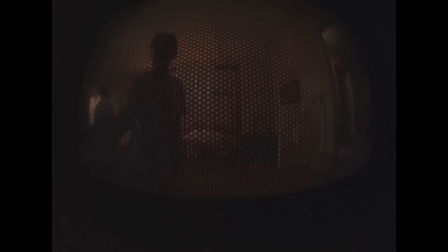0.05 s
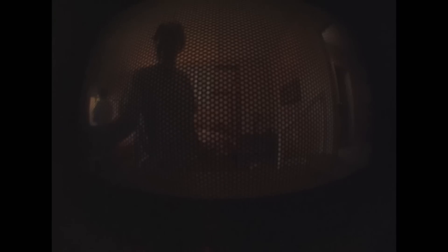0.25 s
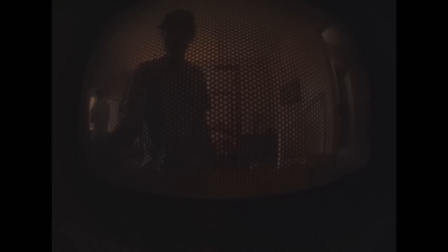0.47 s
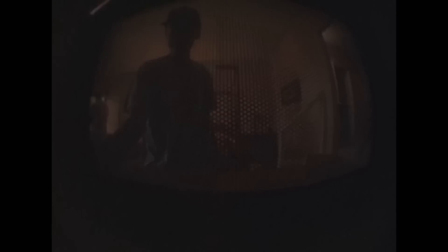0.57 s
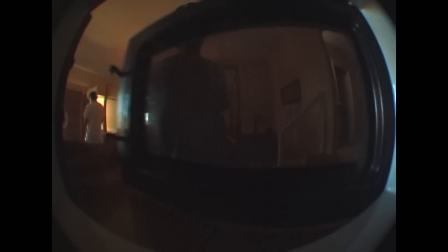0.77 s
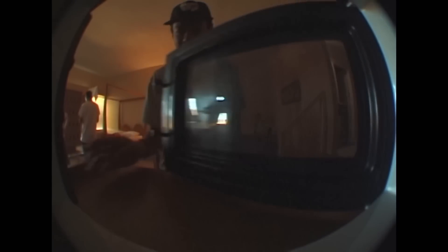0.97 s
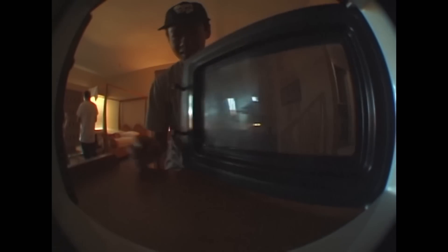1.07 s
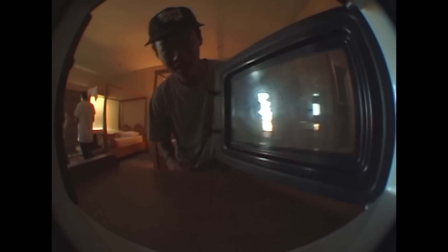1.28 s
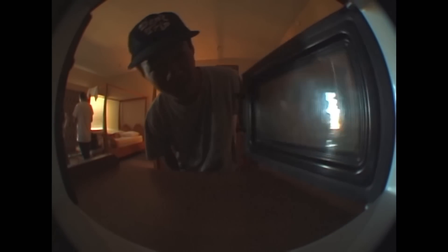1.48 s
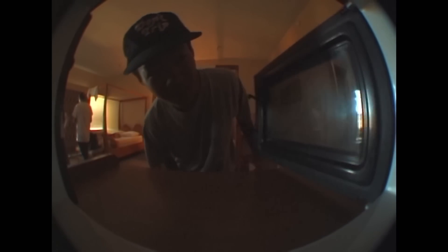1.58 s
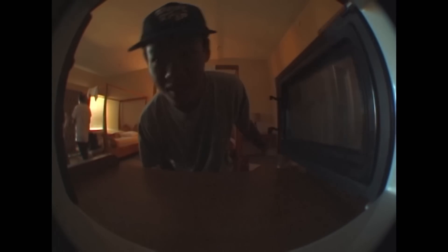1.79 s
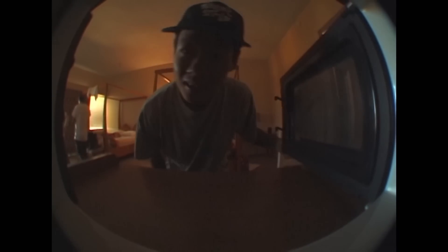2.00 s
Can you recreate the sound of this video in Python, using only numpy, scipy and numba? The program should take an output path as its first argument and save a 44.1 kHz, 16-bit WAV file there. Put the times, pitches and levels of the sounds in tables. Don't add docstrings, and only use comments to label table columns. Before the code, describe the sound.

A microwave oven door opens, heard from inside the box: latch hooks scrape and snap in a loud rattling clunk, the case shudders, then after a quiet swing the door knocks its stop, over low hum.

```python
import sys
import numpy as np
from scipy import signal
from scipy.fft import rfft, irfft, next_fast_len
from scipy.io import wavfile
from scipy.ndimage import uniform_filter1d, map_coordinates
from numba import njit

SR = 44100
rng = np.random.default_rng(int(sys.argv[2]) if len(sys.argv) > 2 else 0)


def output_pcm(signal):
    pcm = np.clip(np.atleast_2d(signal).T, -1, 1) * 32767
    wavfile.write(sys.argv[1], SR, np.round(pcm).astype(np.int16))


def ratio(d):
    e = np.asarray(d, float) / 20
    return 10 ** e


N = 90272


def unit(x):
    return x / np.sqrt(np.mean(x ** 2) + 1e-20)


def along(points, hz):
    f, v = np.transpose(points)
    return np.interp(np.log(hz + 1), np.log(f + 1), v)


def wobble(rate_hz):
    knots = rng.standard_normal(int(N * rate_hz / SR) + 4)
    return map_coordinates(knots, [np.arange(N) * rate_hz / SR])


def filtered(x, response):
    m = next_fast_len(N + SR // 2)
    return irfft(rfft(x, m) * response(np.fft.rfftfreq(m, 1 / SR)), m)[..., :N]


def shaped_noise(response):
    return unit(filtered(rng.standard_normal(N), response))


def body(peaks, f):
    total = 0
    for k, (centre_hz, width_hz, db) in enumerate(peaks):
        damping = 1j * f * width_hz
        total = total + (-1) ** k * ratio(db) * damping / (centre_hz ** 2 - f * f + damping)
    return total


def causal(gain, size):
    c = irfft(np.log(gain + 1e-4), size)
    c = np.concatenate([c[:1], 2 * c[1:size // 2], np.zeros(size - size // 2)])
    return np.exp(rfft(c))


CRACK, CRACK_S = 2.17, 0.00016


def contacts(events, colour, grit_db, octaves=9, slope=None):
    m = next_fast_len(N + SR // 2)
    f, t = np.fft.rfftfreq(m, 1 / SR), np.arange(SR) / SR
    shape, slope_db = colour(f), along(slope, f) if slope else 0
    total = 0
    for start_s, level_db, rise_s, t60_s, *centre_hz in events:
        decay = ratio(level_db - 60 * t / (t60_s + 0.0016))
        swell = decay * (1 - np.exp(-t / (rise_s + 1e-4)) + CRACK * np.exp(-t / CRACK_S))
        grit = ratio(grit_db * np.resize(wobble(900), SR))
        push = swell * unit(grit * rng.standard_normal(SR))
        distance = np.log2((f + 1) / (centre_hz or [150])[0]) / octaves
        tint = shape * causal(ratio(slope_db - 6.35 * distance ** 2), m)
        placed = np.pad(push, (round(start_s * SR), 0))[:N]
        total = total + rfft(placed, m) * tint / np.sqrt(np.mean(abs(tint) ** 2))
    return irfft(total, m)[:N]


# start_s, level_db, rise_s, t60_s
THUMPS = [(.308, -16.5, 0.0022, 0.36), (.39, -20.5, 0.06, 0.99), (.445, -10, 0.023, 0.42),
          (.545, -15, 0.0031, 0.95), (.62, -16, 0.0063, 1), (.72, -17.5, 0.0069, 0.31),
          (.96, -28, 0.014, 0.75), (1.09, -32, 0.007, 0.44), (1.6, -31, 0.014, 0.59),
          (1.833, -15, 0.0048, 1), (1.9, -17, 0.011, 0.38)]
# centre_hz, width_hz, level_db
CASE_MODES = [(60, 27, -18), (100, 19.4, -3.5), (163.5, 32.6, -2), (252.8, 26.5, -5.5), (319.6, 37, -11.5),
              (383.4, 15.3, -9.5), (450, 104, -16.5)]


def case_thumps():
    return contacts(THUMPS, lambda f: body(CASE_MODES, f), grit_db=-1.5)


# start_s, level_db, rise_s, t60_s, centre_hz
RATTLES = [(0.244, -38, 0.019, .6, 1300), (.308, -9, 0.0007, 0.25, 1530),
           (0.361, -9.5, 0.0018, 0.062, 1570), (.383, -25.5, 0.0015, 1, 1350),
           (0.4693, -6, 0.00018, 0.25, 1690), (.497, -4.5, 0.0022, 0.13, 2300),
           (.509, -7.5, 0.0015, 0.059, 2900), (0.542, -15, 0.00056, 0.1, 2600),
           (.575, -19, 0.0058, 0.7, 1390), (.64, -21.5, 0.0045, 0.76, 1600),
           (.735, -27, 0.0027, 0.25, 1700), (.82, -30, 0.0065, 0.21, 1450), (0.971, -27, 0.026, 0.24, 1440),
           (1.055, -35.5, 0.0026, 0.13, 2100), (1.601, -32.5, 0.02, 0.15, 1450),
           (1.833, -7.5, 0.00022, 0.12, 1680), (1.834, -15, 0.0008, .22, 2750),
           (1.86, -10.5, 0.031, 0.36, 1510), (1.919, -30, 0.023, 0.33, 1500)]
# centre_hz, width_hz, level_db
LATCHED_PANELS = [(560, 123, 8), (630, 51, 6.5), (1043, 16, 5.5), (1184, 78, -6.5), (1362, 92, 1),
                  (1540, 48, -2.5), (1677, 136, 0), (1860, 27, -8), (2365, 130, -5), (2430, 120, -13),
                  (2600, 44, 2), (1600, 2500, -5.5), (3520, 1340, -12)]
# centre_hz, width_hz, level_db
FREE_PANELS = [(581, 28, 7), (678, 50, 6), (965, 45, -3.5), (1087, 74, 0), (1277, 37, -0.5),
               (1440, 33.5, 4), (1530, 51, -1.5), (1690, 46, 2.5), (1894, 31, -3.5), (2243, 88, -6.5),
               (2376, 50, -8), (2696, 274, -5), (1600, 2340, -12.5)]
OPENS_S, RATTLE_DB = .56, -1.5


def panel_rattle():
    before = [r for r in RATTLES if r[0] < OPENS_S]
    after = [r for r in RATTLES if r[0] >= OPENS_S]
    latched = contacts(before, lambda f: body(LATCHED_PANELS, f), grit_db=2.0, octaves=1.24)
    free = contacts(after, lambda f: body(FREE_PANELS, f), grit_db=2.5, octaves=1.22)
    return ratio(RATTLE_DB) * (latched + free)


# start_s, level_db, rise_s, t60_s, centre_hz
SCRAPES = [(.311, -32.5, 0.0014, 0.15, 6000), (.3405, -12.5, 0.00074, 0.12, 9900),
           (.3635, -11, 0.0015, 0.082, 7800), (.378, -21, 0.0036, 0.056, 7000),
           (.4698, -11, 0.00018, 0.0049, 5800), (.471, -14.5, 0.00057, 0.3, 5120),
           (.498, -9, 0.0047, 0.078, 6300), (.543, -10.5, 0.00053, 0.058, 4640), (.6, -46, .01, 0.41, 9000),
           (.645, -25.5, 0.015, 0.12, 5850), (.69, -33, 0.0024, 0.038, 9100),
           (.732, -29.5, 0.0018, 0.05, 10400), (1.062, -39, 0.0054, 0.081, 5700),
           (1.6, -45, 0.0067, 0.4, 4100), (1.8334, -20, .0001, 0.01, 9000),
           (1.838, -20.5, 0.00039, 0.035, 9900), (1.945, -40, .003, 0.022, 10000),
           (1.975, -35, 0.0044, 0.036, 10000)]
# freq_hz, density_db
HOOK_SLOPE = [(1500, 25), (3000, 7.5), (5700, -6), (13400, -3), (15000, 8), (16000, -41)]
# centre_hz, width_hz, level_db over the scrape
HOOK_MODES = [(3890, 86, 2), (5100, 32, -4.5), (5700, 170, 3), (7050, 137, -2.5)]


def hook_scrapes():
    def colour(f):
        return 1 + sum(body([mode], f) for mode in HOOK_MODES)
    return contacts(SCRAPES, colour, grit_db=-1, octaves=0.9, slope=HOOK_SLOPE)


# start_s, peak_db, pitch_hz
KNOCKS = [(0.3119, -5, 1390), (0.3216, -8, 1030), (0.3261, -8, 1430), (0.3316, -8, 1520),
          (0.3356, -7, 1120), (0.3426, -10, 1040), (0.365, -8, 1320), (0.3738, -11, 2530),
          (0.383, -9, 1220), (0.4019, -13, 1060), (0.4705, -3, 1220), (0.4754, -9, 1240), (0.481, -7, 1530),
          (0.489, -7, 1100), (0.499, -6, 2380), (0.5045, -6, 1580), (0.5133, -6, 2470), (0.5221, -7, 1130),
          (0.5285, -11, 1910), (0.5349, -9, 1740), (0.5413, -7, 2150), (0.5463, -9, 2430),
          (0.5634, -13, 1790), (0.5795, -19, 1820), (0.5909, -18, 1840), (0.6075, -17, 1730),
          (0.6538, -16, 1530), (0.6772, -15, 1780), (0.7058, -15, 1680), (0.7194, -18, 1660),
          (0.7379, -19, 1250), (0.7544, -19, 1680), (0.7977, -23, 1180), (0.8279, -22, 1320),
          (1.8345, -8, 1230), (1.8556, -13, 1260), (1.8657, -12, 1570), (1.8816, -16, 1230),
          (1.8971, -19, 1490), (1.913, -13, 1510), (1.9341, -16, 1500), (1.9513, -19, 1410),
          (1.9757, -21, 1500), (1.9887, -22, 1530), (2.0014, -24, 1580), (2.0176, -25, 1420)]
KNOCK_T60_S = .016
# start_s, peak_db
SNAPS = [
    (.3122, -9),
    (.4701, -1),
    (1.8331, 5),
]
SNAP_S = .00004


def knocks():
    t, total = np.arange(SR // 20) / SR, np.zeros(N + SR)
    for start_s, peak_db, pitch_hz in KNOCKS:
        sign = rng.choice([-1, 1])
        knock = sign * ratio(peak_db - 60 * t / KNOCK_T60_S) * np.sin(2 * np.pi * pitch_hz * t)
        total[round(start_s * SR):][:len(t)] += knock
    for start_s, peak_db in SNAPS:
        click = ratio(peak_db) * (1 - t / SNAP_S) * np.exp(-t / SNAP_S)
        total[round(start_s * SR):][:len(t)] += click
    return total[:N]


def door():
    return case_thumps() + panel_rattle() + hook_scrapes() + knocks()


# start_s, pitch_hz, level_db, t60_s, lasts_s
RINGS = [(.308, 550, -21, 0.48, 0.185), (.335, 1043, -19, 1, .115), (0.366, 2580, -24.5, 0.34, 0.045),
         (.33, 100, -17.5, 1.6, 0.075), (.425, 90.3, -14, 2.5, 0.026), (.47, 1044, -15, 1.9, 0.06),
         (.472, 560, -18, 2.5, 0.0407), (.49, 590, -16.5, 5.4, 0.042), (.518, 606.5, -12, 2.8, 0.032),
         (0.506, 2470, -15, 0.18, 0.05), (.544, 163.5, -8.5, 0.63, 0.115),
         (0.553, 104.3, -13.5, 2.2, 0.074), (0.658, 157.9, -16, 0.88, 0.043), (.69, 100, -15.5, 1.1, 0.031),
         (1.066, 148.2, -16.5, 0.35, 0.091), (1.833, 172.8, -11.5, 0.74, 0.083),
         (1.835, 284.3, -17, 0.56, 0.091), (1.94, 173, -16.5, 1, 0.09), (1.899, 253, -19, 0.65, 0.041)]
# start_s, pitch_hz, level_db, t60_s, lasts_s
SINGS = [
    (.655, 1450, -31, 1.5, .07),
    (.662, 1670, -30, .8, .063),
    (.82, 1445, -37, 1, .045),
    (1.595, 5080, -59, 5, .075),
    (1.607, 3545, -54, 50, .038),
]
RING_RISE_TURNS, RING_STOP_S = .5, 0.0022
RING_WOBBLE_DB, RING_DRIFT_RAD = 1.3, .35


def rings():
    t, total = np.arange(N) / SR, 0
    for start_s, pitch_hz, level_db, t60_s, lasts_s in RINGS + SINGS:
        u = np.clip(t - start_s, 0, None)
        rise = 1 - np.exp(-u * pitch_hz / RING_RISE_TURNS)
        choke = np.exp(-np.clip(u - lasts_s, 0, None) / RING_STOP_S)
        level = ratio(level_db - 60 * u / t60_s + RING_WOBBLE_DB * wobble(40.16))
        phase = 2 * np.pi * pitch_hz * u + RING_DRIFT_RAD * wobble(60)
        total = total + np.sqrt(2) * rise * choke * level * np.sin(phase)
    return total


# freq_hz, t60_s
KITCHEN = [(100, 0.97), (1000, 0.82), (4000, 0.33), (12000, 0.078)]
WET_DB = -15


def kitchen(x):
    hz, t, z = signal.stft(rng.standard_normal(SR), SR, nperseg=256)
    decay = ratio(-60 * t / along(KITCHEN, hz)[:, None])
    tail = signal.istft(z * decay, SR, nperseg=256)[1]
    return signal.fftconvolve(x, tail / np.linalg.norm(tail))[:N]


def tone(hz, db, shift_s):
    return np.sqrt(2) * ratio(db) * np.cos(2 * np.pi * hz * (np.arange(N) / SR + shift_s))


# freq_hz, open_db, shut_gain_db, wobble_db
HUM = [
    (59.7, -53, 31, 2.9),
    (119.6, -37.5, 8.5, 2.36),
    (143.3, -38.5, -10, 2),
    (562, -68.5, 13.5, 7.5),
]
FAN_HZ, FAN_DB, FAN_FROM_S, FAN_RISE_S = 302, -44, 0.82, 0.078


def compressor(shut, shift_s):
    total = 0
    for hz, open_db, shut_gain_db, wobble_db in HUM:
        total = total + tone(hz, open_db + shut_gain_db * shut + wobble_db * wobble(14), shift_s)
    opening = np.clip((np.arange(N) / SR - FAN_FROM_S) / FAN_RISE_S, 0, 1)
    return total + opening * tone(FAN_HZ, FAN_DB + wobble(11.9), shift_s)


# freq_hz, level_db
WHINE = [(2099, -56.5), (2697, -56), (3295, -56.5), (3898, -66), (4797, -70), (5394, -69.5), (5949, -65),
         (6455, -67.5), (6551, -70), (10191, -73), (10788, -74), (10939, -83), (11386, -84.5), (11687, -77)]
MUFFLED_HZ, MUFFLED_DB = 3000, -5


def camera_motor(shut, shift_s):
    total = 0
    for hz, db in WHINE:
        muffle_db = MUFFLED_DB * shut * (hz < MUFFLED_HZ)
        total = total + tone(hz, db + muffle_db + 1.2 * wobble(8), shift_s)
    return total


# freq_hz, density_db
AIR = [(24, -37), (60, -18.5), (137, 0), (237, -13.5), (600, -16), (1500, -20.5), (2200, -24.5),
       (6300, -44)]
AIR_DB, AIR_SHUT_DB = -38.5, -6.5
# freq_hz, density_db
HISS = [(1000, -11), (6300, -0.5), (8500, -10), (10500, -6.5), (14300, -13), (15000, -40)]
HISS_DB, HISS_SHUT_DB = -60.5, 8.5
BOX_AIR_DB = -41


def air_noise(shut):
    air = shaped_noise(lambda f: ratio(along(AIR, f)))
    air = air * ratio(AIR_DB + AIR_SHUT_DB * shut + 2.3 * wobble(6.12))
    hiss = ratio(HISS_DB + HISS_SHUT_DB * shut) * shaped_noise(lambda f: ratio(along(HISS, f)))
    cavity = shaped_noise(lambda f: body([(215, 80, 0)], f) ** 2)
    return air + hiss + ratio(BOX_AIR_DB) * shut ** 3 * cavity


# time_s, shut_0_to_1
SHUT = [(0, 0.92), (.32, 1), (.4, 1), (.62, 0.77), (.8, 0.83), (1.0, 0.27), (1.2, 0.42), (1.5, 0.24),
        (2.05, 0.36)]


def background():
    shut = np.interp(np.arange(N) / SR, *np.transpose(SHUT))
    shift_s = rng.random()
    return compressor(shut, shift_s) + camera_motor(shut, shift_s) + air_noise(shut)


def scene():
    hits = door()
    return (hits + rings() + ratio(WET_DB) * kitchen(hits) + background())[None]


@njit
def follow(x, up, down):
    out, level = np.empty_like(x), 0.
    for i in range(len(x)):
        level += (up if x[i] > level else down) * (x[i] - level)
        out[i] = level
    return out


def low_pass(x):
    return signal.sosfilt(signal.butter(12, 16510, fs=SR, output="sos"), x)


KNEE_DB, SQUEEZE, GRIP_S, LET_GO_S = -10.5, 0.39, 0.00085, 0.037
CEILING, MIC_TOP_HZ = .84, 13940
FADE_FROM_S, FADE_S = 0.034, 0.058


def record(dry):
    level = follow(abs(dry[0]), 1 / (GRIP_S * SR + 1), 1 / (LET_GO_S * SR))
    gain = np.maximum(level / ratio(KNEE_DB), 1) ** -SQUEEZE
    x = dry * uniform_filter1d(gain, size=61)
    x = x / (1 + abs(x / CEILING) ** 5) ** .2
    x = filtered(x, lambda f: 1 / (1 + (f / MIC_TOP_HZ) ** 30))
    fade = np.clip((np.arange(N) / SR - FADE_FROM_S) / FADE_S, 1e-3, 1)
    return low_pass(x * fade)


dry = scene()
out = record(dry)
output_pcm(out)
```